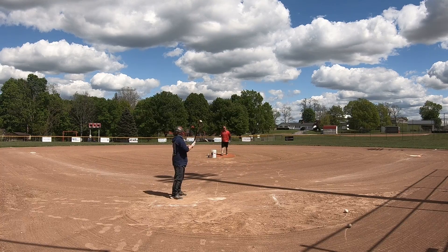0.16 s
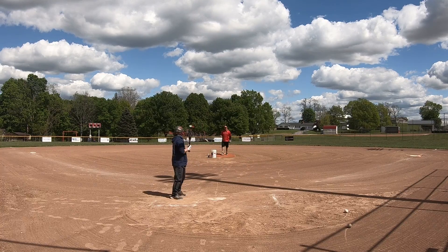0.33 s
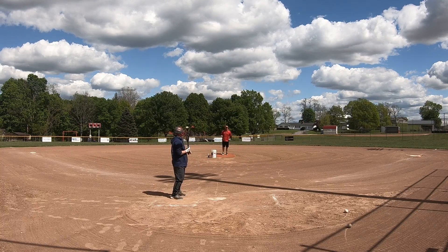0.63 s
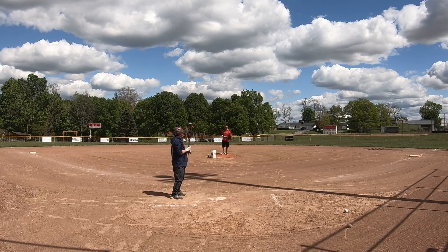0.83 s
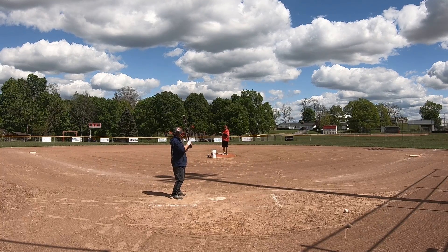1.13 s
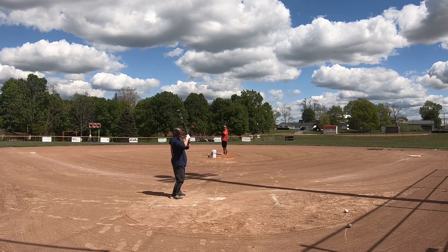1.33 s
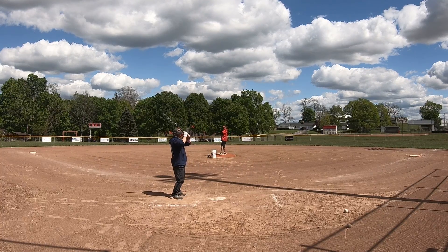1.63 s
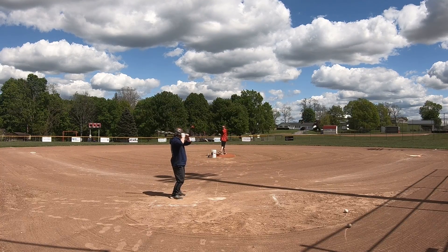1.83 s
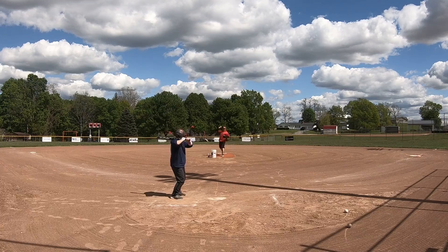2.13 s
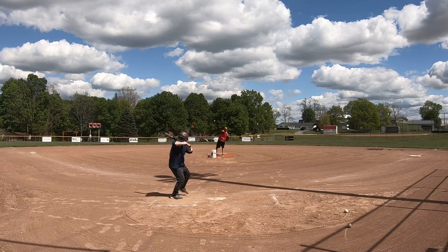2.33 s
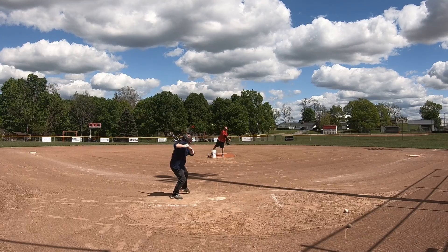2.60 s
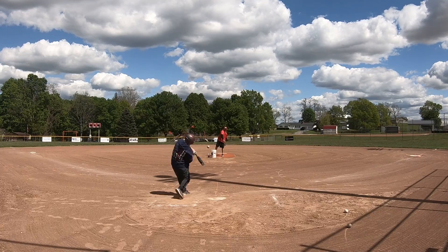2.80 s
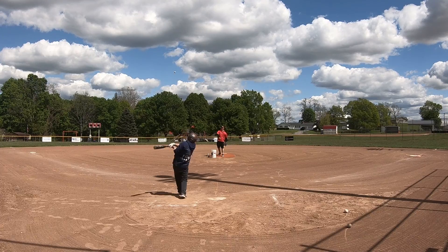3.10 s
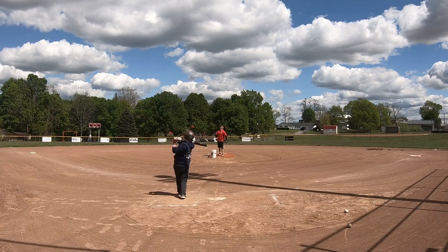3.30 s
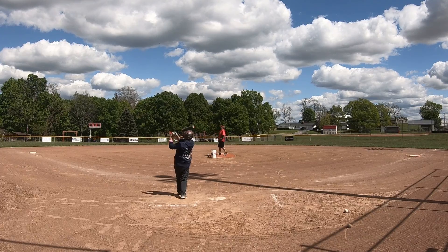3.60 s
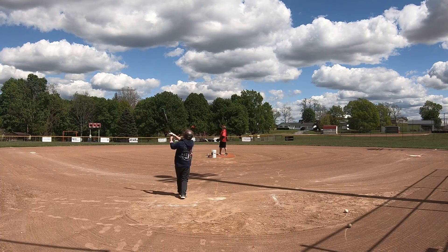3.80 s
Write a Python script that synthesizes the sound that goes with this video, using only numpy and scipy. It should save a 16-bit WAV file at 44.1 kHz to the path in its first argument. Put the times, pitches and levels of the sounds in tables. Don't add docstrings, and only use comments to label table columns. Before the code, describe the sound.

A metal bat cracks against a ball at about 2.98 s, very loud and close, with a low thud and short ring. An echo follows within 0.05 s, then a scattered tail with a faint swell near 3.35 s. Earlier, a gust stops at 0.07 s, a tiny silence, then low microphone wind throughout, faint chirps, dove coos at 1.5 and 1.8 s, and soft dirt scuffs from 2.75 s.

```python
import sys
import numpy as np
from scipy import signal
from scipy.fft import rfft, irfft
from scipy.io import wavfile
from scipy.ndimage import uniform_filter1d

SR = 44100
rng = np.random.default_rng(int(sys.argv[2]) if len(sys.argv) > 2 else 0)


def linear_from_db(decibels):
    return 10 ** (np.asarray(decibels, float) / 20)


def persist_wave(psi):
    counts = np.round(np.clip(psi, -1, 1) * 32767).astype(np.int16)
    wavfile.write(sys.argv[1], SR, np.atleast_2d(counts).T)


N = 174195
T = np.arange(N) / SR
F = np.fft.rfftfreq(N, 1 / SR)


def on_hz(table, hz, col=1):
    a = np.array(table, float)
    return np.interp(np.log(np.maximum(hz, 1)), np.log(a[:, 0]), a[:, int(col)])


def colour(x, gain):
    y = irfft(rfft(x) * gain, N)
    return y / np.sqrt(np.mean(y ** 2))


def walk(rate):
    k = int(SR / rate)
    steps = np.repeat(rng.standard_normal(N // k + 1), k)
    return 1.26 * uniform_filter1d(uniform_filter1d(steps, k), k)[:N]


def pan(db):
    return linear_from_db(np.array([db / 2, -db / 2])).reshape(2, -1)


def ports(x, side):
    turn = np.exp(.5j * np.array([[1], [-1]]) * on_hz(side, F))
    return irfft(rfft(x) * turn * pan(on_hz(side, F, 2)), N)


# pitch_hz, likeness (-1 opposite, 1 same)
PORT_LIKENESS = [(40, 0.6), (90, .15), (180, 1), (300, 0.43), (500, -0.52), (800, -0.85), (1900, -0.2),
                 (3200, 0.56), (7000, .1)]


def bed(table, lo, hi, swell_db, flick_db, rate):
    out, swell = 0, walk(rate / 4)
    for hz in lo * 2 ** np.arange(0, np.log2(hi / lo), .5):
        alike = np.clip(on_hz(PORT_LIKENESS, hz), -1, 1)
        bell = np.exp(-(np.log2(np.maximum(F, 1) / hz) / .5) ** 2)
        gain = linear_from_db(on_hz(table, F)) * bell
        mid, side = irfft(rfft(rng.standard_normal((2, N))) * gain, N)
        opposite = np.array([1, -1])[:, None] * side * np.sqrt(1 - alike)
        both = opposite + mid * np.sqrt(1 + alike)
        out = out + both * linear_from_db(swell_db * swell + flick_db * walk(rate))
    return out / np.sqrt(np.mean(out ** 2))


CUT_S, RESUME_S = .07343, .1027
# pitch_hz, level_db
EARLIER_TONE = [(30, -10), (60, 1.5), (113, -10.5), (200, -6), (333, -10.5), (510, -21), (800, -27.5),
                (1110, -25), (1600, -46), (3100, -51.5), (3800, -62), (6000, -73), (12000, -81)]


def earlier():
    step_start, step_end = -.18, -.09
    t = T - 0.03435
    buffet = linear_from_db(-9.5) * np.cos(2 * np.pi * 98 * t) * np.exp(-(t / 0.019) ** 2)
    start = np.exp(-T / .003)
    end = np.exp(-np.abs(CUT_S - T) / .003)
    gust = bed(EARLIER_TONE, 28.9, 12000, 0.85, 1.0, 27) * linear_from_db(-30) * (1 - 1.6 * (start + end))
    left = step_start * start + step_end * end + 0.094 * buffet
    right = buffet + step_end * end / 3
    return gust + np.array([left, right])


# pitch_hz, level_db
WIND_TONE = [(12, -36), (20, -2), (81, 4.5), (173, -2), (313, -17.5), (369, -20.5), (422, -28), (568, -36),
             (700, -43), (910, -72), (1540, -120)]
# time_s, level_db, left_minus_right_db
GUSTS = [
    [(0.11, -46.5, 1), (1.08, -40, -6.5), (2.74, -37.5, -6.5), (2.9, -35.5, -8.5), (2.95, -36, -5)],
    [(3.12, -38, -9.5), (3.216, -40.5, -8), (3.372, -35.5, -6), (3.516, -37, -7), (3.95, -39.5, -8)],
]


def wind():
    s, db, lean_db = np.array(GUSTS[0] + GUSTS[1]).T
    rise_db = -1.5 - 20.5 * np.clip(1 - T / 0.99, 0, 1)
    deep = bed(WIND_TONE, 20.6, 125, 0.25, 0.56, 12) * linear_from_db(rise_db)
    flutter = bed(WIND_TONE, 173.2, 800, 0.88, 2.83, 18) * linear_from_db(-4.5)
    return (deep + flutter) * linear_from_db(np.interp(T, s, db) + 1) * pan(np.interp(T, s, lean_db))


# pitch_hz, level_db
AIR_TONE = [(260, -44), (450, -6.5), (779, -7), (1300, -16.5), (2000, -27), (3700, -25), (5000, -30.5),
            (6000, -30), (6600, -36.5), (13000, -45.5), (15600, -54)]


def open_air():
    return bed(AIR_TONE, 450, 15000, 0.25, 2.0, 8) * linear_from_db(-62.5 - 1 * (T > 3.1))


# time_s, level_db
INSECT_LEVEL = [(.1, -108), (.4, -87), (2.95, -76.5), (3.101, -93.5), (3.95, -95)]


def insects():
    s, db = np.array(INSECT_LEVEL).T
    band = colour(rng.standard_normal((2, N)), 1 / (1 + ((F - 5750) / 180) ** 2))
    return band * linear_from_db(np.interp(T, s, db) + 2.5 * walk(20)) * pan(-5.5)


# start_s, length_s, from_hz, to_hz, level_db
CHATTER_CALLS = [(.11, .2, 3500, 4000, -77), (.3, .1, 4300, 3660, -71), (.35, 0.15, 3300, 3165, -71.5),
                 (.38, .1, 3900, 3850, -72.5), (.64, 0.12, 4300, 3770, -66), (.72, 0.2, 3900, 3790, -70.5),
                 (.76, 0.13, 3200, 3200, -78), (1.15, .25, 3600, 3170, -88), (1.41, 0.12, 4400, 4000, -70),
                 (1.45, 0.13, 3400, 3900, -72), (1.66, 0.11, 3400, 3400, -80.5),
                 (2.595, .03, 4400, 4200, -69), (1.96, 0.12, 2510, 2230, -74),
                 (2.04, 0.087, 2530, 3020, -73), (.45, 0.18, 3860, 3930, -78),
                 (2.62, 0.11, 3000, 2580, -62)]
# start_s, length_s, from_hz, to_hz, level_db
WHISTLES = [(.575, .055, 1950, 2550, -68), (.615, .035, 2500, 2450, -72), (.605, .035, 2800, 3150, -70),
            (.865, .035, 1900, 2250, -71), (.875, .04, 2500, 3100, -72), (.9, .04, 3000, 2700, -72),
            (1.155, .03, 3280, 3300, -71), (1.4, .08, 4950, 4900, -78), (1.39, .035, 3100, 3050, -76),
            (1.685, .025, 3180, 3200, -74), (1.89, .13, 3150, 2750, -75), (2.585, .015, 6500, 6500, -76),
            (2.615, .015, 6500, 6450, -76), (2.59, .03, 3750, 3700, -68), (2.61, .035, 3500, 2700, -68),
            (2.638, .03, 3230, 3100, -60), (2.655, .05, 2850, 2550, -58)]
# time_s, pitch_hz, level_db
DOVE_COOS = [
    [(1.53, 497, -72), (1.574, 546, -61.5), (1.614, 571, -56), (1.645, 527, -74), (1.66, 535, -67)],
    [(1.8, 472, -75), (1.87, 541.6, -53.5), (1.902, 565, -48), (1.972, 577, -58), (1.99, 565, -77),
     (2.06, 585, -65)],
]


def birds():
    coo, chirp = np.zeros(N), np.zeros(N)
    for call in DOVE_COOS:
        s, hz, db = np.array(call).T
        turns = np.cumsum(np.interp(T, s, hz)) / SR
        coo += np.sin(2 * np.pi * turns) * linear_from_db(np.interp(T, s, db, -150, -150) + 3.5)
    clear, rough, shake = linear_from_db(2.0 * walk(120)), walk(500), walk(700)
    for table, flutter, depth in ((WHISTLES, clear, .018), (CHATTER_CALLS, rough, .07)):
        for s, length, hz0, hz1, db in table:
            a = slice(int(s * SR), int((s + length) * SR))
            u = (T[a] - s) / length
            hz = (hz0 + (hz1 - hz0) * u) * (1 + depth * shake[a])
            turns = np.cumsum(hz) / SR
            chirp[a] += linear_from_db(db) * flutter[a] * np.sin(np.pi * u) * np.sin(2 * np.pi * turns)
    leaves = rng.standard_normal((2, 3000)) * linear_from_db(-31 - 60 * np.arange(3000) / SR / .09)
    late = signal.fftconvolve(chirp[None], leaves)[:, :N]
    return coo * linear_from_db(6.5) * np.array([[-1], [1]]) * pan(-7) + (chirp + late) * pan(-2.2)


# start_s, level_db, fade_60db_s
SCUFFS_AT = [
    (2.748, -62, 0.34),
    (2.795, -68.5, 0.38),
    (2.86, -68, .25),
]


def scuff():
    bell = np.exp(-(np.log2(np.maximum(F, 1) / 2600) / 1.1) ** 2)
    grit = colour(rng.standard_normal((2, N)), bell)
    level = sum(linear_from_db(db - 60 * np.maximum(T - s, 0) / t60) * (T > s) for s, db, t60 in SCUFFS_AT)
    return grit * linear_from_db(2 * walk(180)) * level


def ring(t, hz, t60):
    return np.sin(2 * np.pi * hz * t) * linear_from_db(-60 * t / t60)


BARREL_HZ = 1592
# start_s, crack_db, thud_db, barrel_ring_db, wall_ping_db
HITS = [
    (2.9778, -13, -6, -45.5, -5.5),
    (2.997, -43.5, -27.5, -27.5, -41),
    (3.0266, -24, -15, -32.5, -22.5),
    (3.0323, -30, -15.5, -17, -29.5),
    (3.079, -44, -44, -47.5, -38.5),
    (3.111, -43, -43, -48, -54),
    (3.3, -65.5, -48, -67, -49.5),
    (3.348, -67.5, -45.5, -71, -51),
]
# pitch_hz, level_db, fade_60db_s
WALL_PINGS = [(2237, -3, 0.028), (2268, -15.5, 0.069), (1643, -13.5, 0.051), (1248, -15, 0.012),
              (920, -6.5, 0.015), (3430, -18.5, 0.022), (4200, -20, 0.0098), (6120, -30, 0.027),
              (7395, -36, 0.035)]
# pitch_hz, level_db
CRACK_TONE = [(180, -40.5), (300, -10.5), (800, -1.5), (1180, -6.5), (2290, -11), (2790, -11.5),
              (4510, -22.5), (6270, -23), (7600, -27), (8600, -43.5), (15600, -60.5)]
# pitch_hz, left_lead_radians, left_minus_right_db
BAT_SIDE = [(131, 0.35, -6), (283, 1.05, -14), (695, 4, -7.5), (1250, 0.9, -5), (1600, 1, -9),
            (2270, .5, -8.5), (4000, 1.7, -2.5), (6400, -6, -15.5), (9000, -11, -11.5)]
BACKSTOP_SIDE = [(130, 0.77, -6), (290, 0.6, -8), (720, 2.5, -5.5), (1570, 2.28, -8.5), (2280, 2.8, -6.5),
                 (4000, 0.68, 0.5), (6000, 10, -10), (10000, 3, -10)]


def bat():
    hit_s = HITS[0][0]
    out = np.zeros((2, N))
    hiss = colour(rng.standard_normal(N), linear_from_db(on_hz(CRACK_TONE, F)))
    for s, crack_db, thud_db, ring_db, ping_db in HITS:
        echo = int(s > 3.01)
        a = slice(int(s * SR), int((s + .4) * SR))
        t = np.maximum(T[a] - s, 0)
        flat = .99 if echo else 1
        split_hz = 13.3 if echo else 33
        beat = np.sin(np.pi * split_hz * t + .7)
        pair = ring(t, flat * BARREL_HZ, .2) * beat
        ping = sum(linear_from_db(db) * ring(t, flat * hz, t60) for hz, db, t60 in WALL_PINGS)
        ping = ping * (1 - np.exp(-t / 0.0028))
        u = np.maximum(t - 0.0017, 0)
        glide_hz, glide_s = 370, 0.0012
        turns = 113 * u + glide_hz * glide_s * (1 - np.exp(-u / glide_s))
        thud = np.sin(2 * np.pi * turns) * linear_from_db(-60 * u / 0.033) * (1 - np.exp(-u / 0.00081))
        smear = 0.00066 + .02 * (s - hit_s)
        crack = hiss[a] * t / smear * np.exp(1 - t / smear)
        out[echo, a] += linear_from_db(crack_db) * crack + linear_from_db(ring_db) * pair
        out[echo, a] += linear_from_db(thud_db) * thud + linear_from_db(ping_db) * ping
    lead_in = colour(hiss, np.exp(-((F - 2200) / 300) ** 2) + 0.12) * linear_from_db(-36.5)
    lead_in = lead_in * np.exp(-np.abs(T - hit_s) / 0.0079) * (T < hit_s)
    return ports(out[0] + lead_in, BAT_SIDE) + ports(out[1], BACKSTOP_SIDE)


# pitch_hz, level_db
FIELD_TONE = [(240, -27), (400, -1), (770, -10.5), (1180, -11), (1640, -10), (1780, -13), (2340, -17.5),
              (4970, -32), (7600, -38.5), (12000, -60.5), (15600, -85.5), (22000, -120)]


def field():
    hit_s, trees_s = HITS[0][0], 3.347
    t = np.maximum(T - hit_s, 0)
    barrel_peak = 0.72 * np.exp(-((F - BARREL_HZ) / 70) ** 2)
    wall_peak = 0.48 * np.exp(-((F - WALL_PINGS[0][0]) / 130) ** 2)
    peaks = 1 + barrel_peak + wall_peak
    hum = 1 + 1.7 * np.exp(-((F - 1670) / 14) ** 2) + 1.2 * np.exp(-((F - 2400) / 40) ** 2)
    near = bed(FIELD_TONE, 400, 14000, 2.8, 0.95, 60) * linear_from_db(-40 - 60 * t / .55)
    trees_db = 6 * (T > trees_s) * np.exp(-np.abs(T - trees_s) / 0.07)
    far = bed(FIELD_TONE, 400, 4500, 1.0, 0.74, 40) * linear_from_db(-48.5 - 60 * t / 3.31 + trees_db)
    near_bright = rfft(near * (t > 0)) * (1 + (F / 1500) ** 0.63)
    far_humming = rfft(far * (t > 0)) * hum
    return irfft((near_bright + far_humming) * peaks, N) * pan(-0.5)


def scene():
    air = open_air()
    now = wind() + air + birds() + insects() + scuff() + bat() + field()
    fade_in = np.clip((T - RESUME_S) / .003, 0, 1)
    fade_out = np.clip((T[-1] - T) * 100, .1, 1)
    return earlier() * (T < CUT_S) + now * fade_in * fade_out


def top_cut(x):
    return signal.sosfilt(signal.butter(12, 15710, fs=SR, output="sos"), x)


def record(dry):
    ceiling = .85
    mix = ceiling * np.tanh(dry / ceiling)
    return top_cut(mix)


dry = scene()
out = record(dry)
persist_wave(out)
```